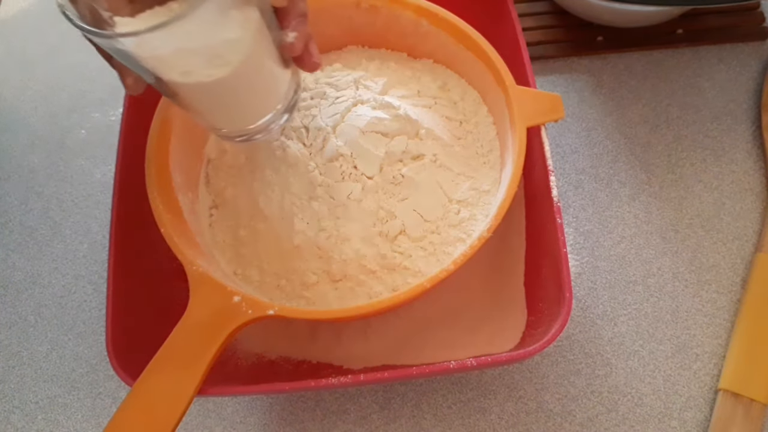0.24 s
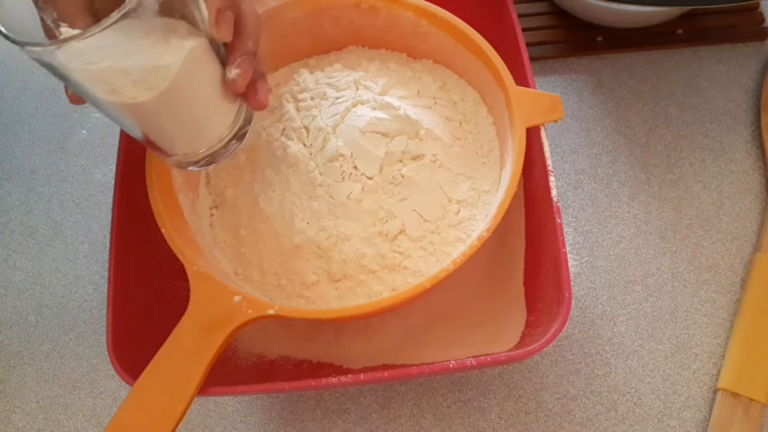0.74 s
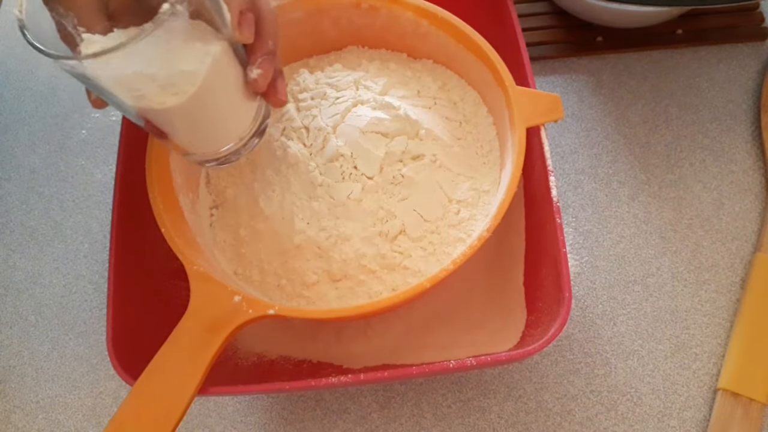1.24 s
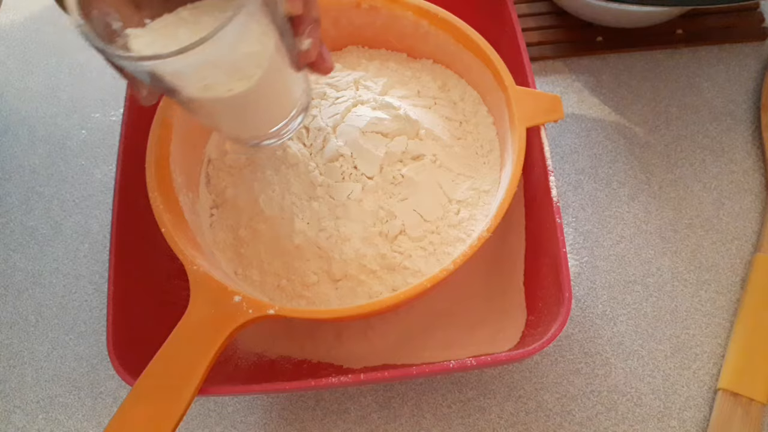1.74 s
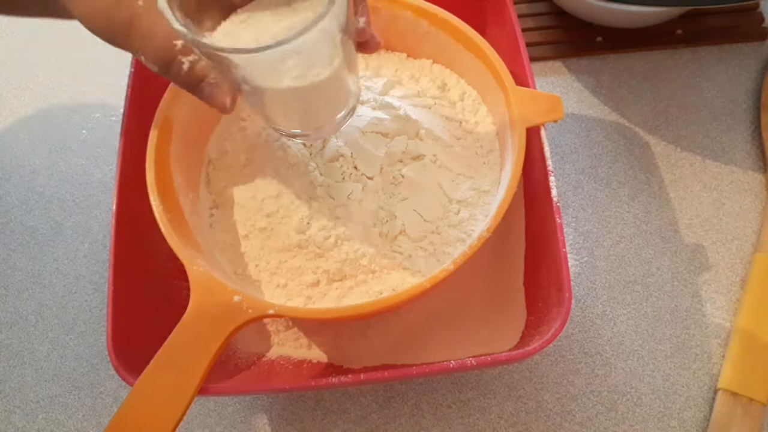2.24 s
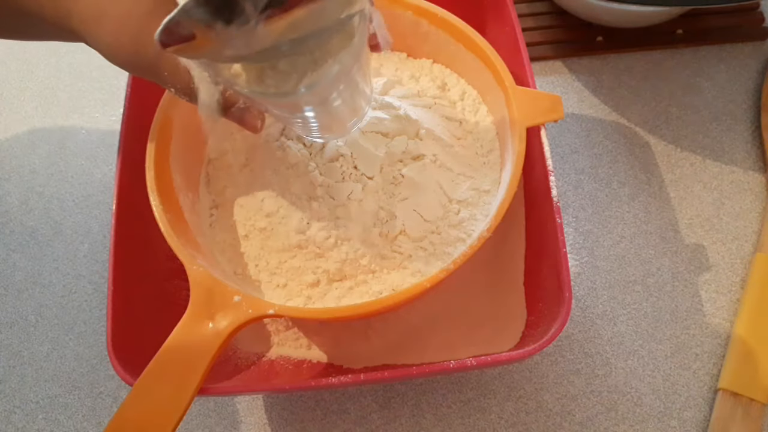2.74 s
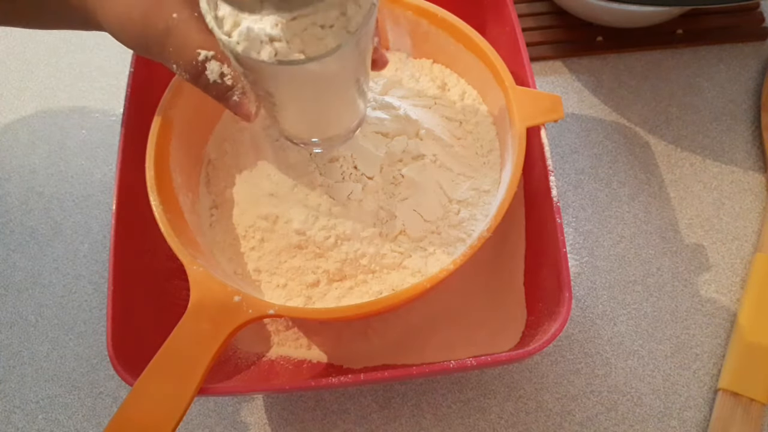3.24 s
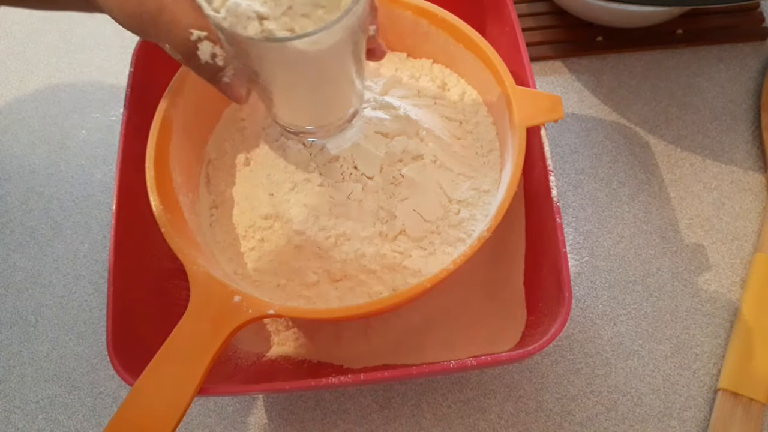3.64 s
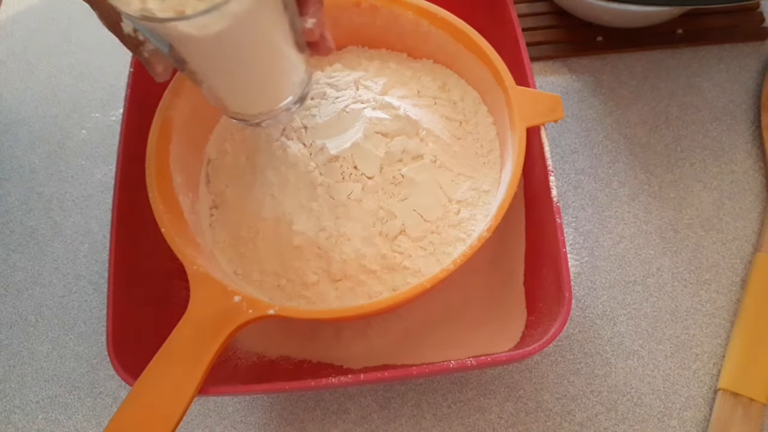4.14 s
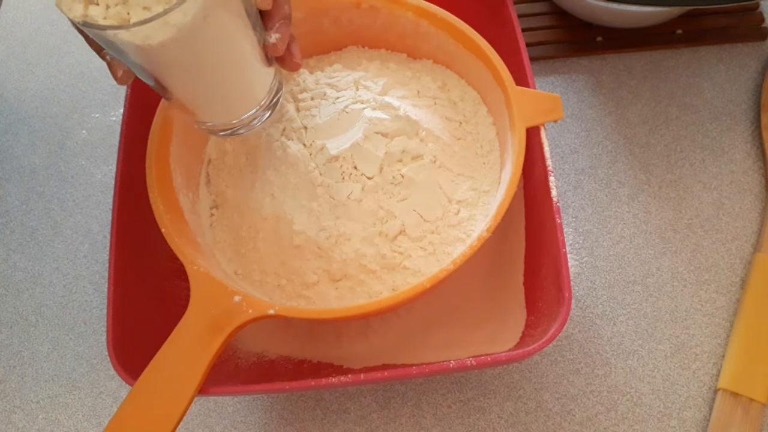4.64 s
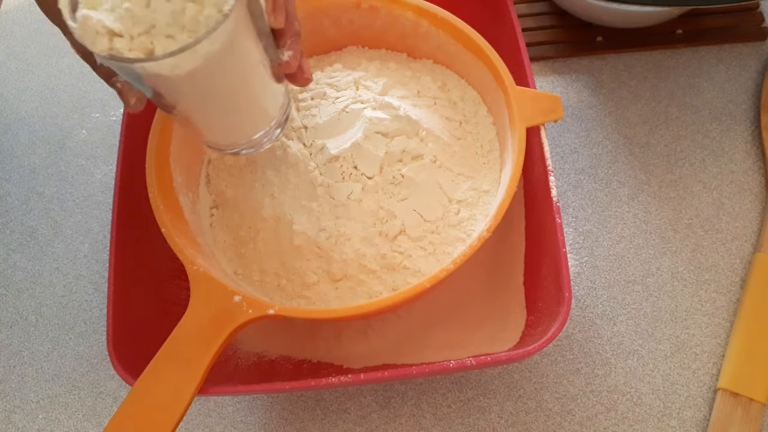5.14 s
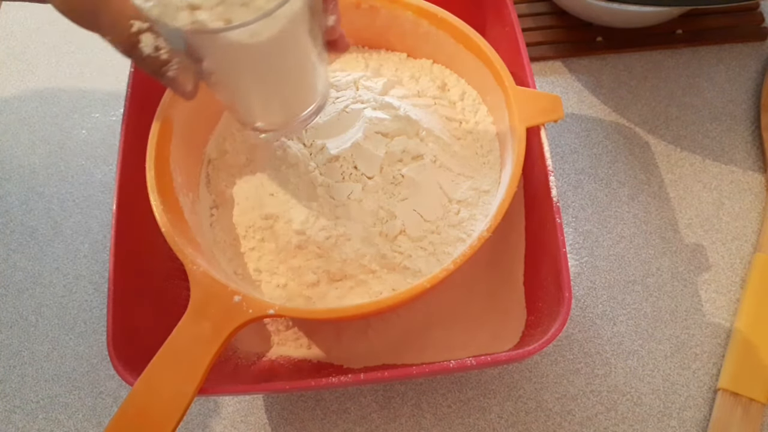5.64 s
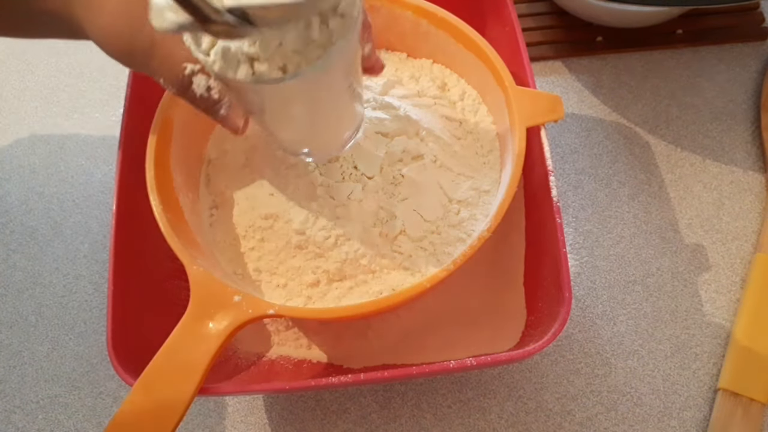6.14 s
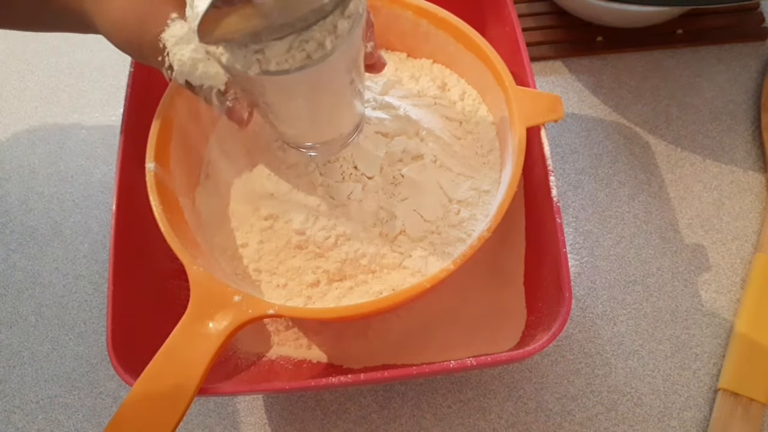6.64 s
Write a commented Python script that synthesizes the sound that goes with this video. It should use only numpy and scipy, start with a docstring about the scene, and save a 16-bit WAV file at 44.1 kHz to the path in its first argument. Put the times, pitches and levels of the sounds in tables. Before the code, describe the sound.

Two short spells of rustling, recorded closely with slight stereo width and a short room echo. A spoon rasps through flour while its paper bag crackles, pops and thumps softly. Between the spells lies a low soft room hush, with a faint bump and the slightest whisper of flour sliding into a glass. The second spell is busier and ends in a strong scrape and snap, before another almost silent pour.

```python
"""A small kitchen, a close pair of microphone ports: a spoon twice digs flour out of a paper bag into a glass.
The digging is grains of filtered noise: the spoon scrapes through powder, the bag's walls rumble, paper crinkles.
Creases snap as noise bursts that ring; the walls flex with soft thuds of decaying sines and a puff of air.
The pouring is only a faint powdery hiss, with dull bumps of hand, spoon and glass.
The room answers with decaying noise echoes, over a quiet hush of coloured noise."""
import sys
import numpy as np
from scipy import signal
from scipy.fft import rfft, irfft, next_fast_len
from scipy.io import wavfile
from scipy.ndimage import uniform_filter1d, map_coordinates

SR = 44100
rng = np.random.default_rng(int(sys.argv[2]) if len(sys.argv) > 2 else 0)


def inscribe(sig):
    """Save sig as 16-bit PCM at rate SR to the path in sys.argv[1].

    A 1-D sig is mono; a 2-D sig holds one channel per row.
    Samples are clipped to [-1, 1] before scaling.
    """
    pcm = np.round(np.clip(np.atleast_2d(sig).T, -1, 1) * 32767)
    wavfile.write(sys.argv[1], SR, pcm.astype(np.int16))


N = 304290  # length in samples

# colour of the quiet room: f/Hz, level/dB per Hz
HUSH_SPECTRUM = [(20, 0), (45, -13.5), (90, -1), (145, 0), (200, -3), (255, -5.5), (350, -4.5), (520, -9),
                 (850, -11), (1800, -15), (4000, -19.5), (7000, -26), (9500, -29), (13000, -25)]
# difference between the ports for the hush: f/Hz, side re mid/dB
HUSH_WIDTH = [(60, -19.5), (300, -18), (700, -12.5), (2200, -11.5), (7000, -2.5)]
# difference between the ports for rustle and echoes: f/Hz, side re mid/dB
RUSTLE_WIDTH = [(60, -47), (3100, -90.5), (3800, -35.5), (5000, -5), (13000, -6.5)]
# reverberation of the kitchen: f/Hz, t60/s
KITCHEN_T60 = [(100, 0.24), (260, 0.46), (1800, .37), (5000, .35), (12000, 0.23)]
# flour slides off the spoon: t of peak/s, peak hiss level/dB, rise/s, fall by 60 dB/s (negative: grows on)
POURS = [(2.782, -66, .003, .1), (2.83, -75, .06, 3.16), (2.975, -62, 0.078, 0.1), (6.4, -73, .06, 0.5),
         (6.743, -60, .003, 0.0061), (6.89, -75.5, 0.115, -2.57)]
# colour of the sliding flour: f/Hz, level/dB per Hz
POWDER_SPECTRUM = [(300, -35), (900, -4.5), (1800, -5), (2800, -0.5), (4200, -15), (6000, -5),
                   (7500, -10.5), (9500, -5.5), (13000, -10.5)]
# faint bumps of hand, spoon and glass: t/s, peak level/dB, f/Hz, t60/s
BUMPS = [(2.202, -57, 142.7, 0.36), (2.97, -59.5, 160.1, 0.187), (5.885, -54, 298, 0.31),
         (6.682, -57, 1091, 0.0947), (6.689, -58, 215.7, 0.62), (6.74, -58, 1240, 0.0247)]
# the bag's wall is pushed in: t/s, peak level before the bass cut/dB, f/Hz, hollow re wall/dB
THUDS = [(0.264, -44.5, 185, -9), (0.42, -34, 227, 1.5), (0.71, -31.5, 341, -8.5), (0.968, -40, 145, 3),
         (0.99, -31, 137.1, -5), (1.144, -38, 355, -1), (1.276, -28, 351.5, 1.5), (1.494, -31.5, 180, 5.5),
         (1.912, -35.5, 151, -9.5), (4.311, -31, 305.7, -3), (4.41, -32, 399, -5), (4.537, -28, 348.4, -3),
         (4.777, -38, 145.1, -2), (4.856, -37, 200.2, 1.5), (5.287, -31.5, 330.2, -13.5),
         (5.527, -36, 143, -9.5)]
# resonances of the bag's hollow: f/Hz, level/dB, t60/s
BAG_MODES = [(140, -17, .1), (199, -10, .1), (345, -6, .06), (480, -10, .03)]
# creases that snap: t/s, peak level/dB, f/Hz, ring re crack/dB
SNAPS = [(0.263, -38.5, 1200, -5.5), (0.42, -27, 373, 2), (0.455, -28.5, 1140, 6), (0.534, -14, 3730, -6),
         (0.991, -25.5, 1333, -3.5), (1.22, -29, 1367, 0), (1.273, -28, 1195, -5),
         (1.494, -13.5, 1064, -0.5), (1.905, -27, 967, 2.5), (4.309, -33, 1340, -8.5),
         (4.342, -28, 1210, -2), (4.411, -34, 515, 1.5), (4.5351, -21, 510, -1), (4.5576, -12.5, 5240, 0.5),
         (4.848, -28.5, 980, -2), (4.969, -27.5, 1126, 2), (5.021, -19, 3200, -10.5),
         (5.131, -25.5, 1163, 12), (5.497, -29.5, 1210, 5.5), (5.524, -20.5, 2885, -1)]
# colour of a snap's crack: f/Hz, level/dB per Hz
CRACK_SPECTRUM = [(30, -33), (100, -14.5), (320, 4), (700, -10), (1200, 8), (2000, -1), (3200, 6),
                  (6000, -3), (9000, -4), (13000, -11.5)]
# the paper crumples brightly as the spoon levers against it: t of peak/s, peak level/dB
CRUMPLES = [(0.282, -52), (0.995, -40), (1.114, -48.5), (1.278, -46), (1.37, -50.5), (1.895, -39.5),
            (4.497, -40.5), (4.545, -42), (5.519, -42)]
# colour of the crinkling paper: f/Hz, level/dB per Hz
CRINKLE_SPECTRUM = [(900, -38), (1800, -6), (2600, 2), (3300, -3), (4500, -2.5), (5500, -6), (6400, -5.5),
                    (7600, -8.5), (8700, -5), (9500, -12.5), (13000, -16.5)]
# colour of the shaken walls and of their puffs of air: f/Hz, level/dB per Hz
RUMBLE_SPECTRUM = [(30, -40.5), (70, -14.5), (110, -10.5), (140, -1.5), (220, -1.5), (260, -3), (345, 2.5),
                   (440, -5), (650, -20), (1500, -56.5)]
# colour of the spoon in the flour: f/Hz, level/dB per Hz
SCRAPE_SPECTRUM = [(250, -33.5), (400, -11.5), (510, 1), (740, -1), (950, -1), (1150, 1.5), (1400, 1.5),
                   (1900, -5), (2600, -11), (5000, -41)]
# pushes of the spoon through the flour: t/s, attack/s, length/s, scrape level/dB,
# wall rumble re scrape/dB, crinkle re scrape/dB, swell/(dB per s)
STROKES = [(0.262, 0.0036, .025, -57, -1, -1.5, -0.5), (0.416, 0.0056, 0.36, -47.5, -2.5, -0.5, -4.5),
           (0.694, .008, 0.0094, -45.5, -7.5, 0.5, -1.5), (0.896, 0.0078, .29, -51.5, -2, -1.5, -8.5),
           (1.199, 0.054, 0.4, -50, -7, 0.5, 6), (1.631, .06, 0.14, -53.5, -7, 3, -12),
           (1.782, 0.036, 0.117, -52, -7, -0.5, 35), (4.31, .01, 0.047, -45.5, -2, -2, -3),
           (4.407, 0.0071, 0.19, -44.5, -3, 0, 20.5), (4.673, 0.048, 0.18, -51.5, -1, 1, 37.5),
           (4.919, .04, 0.21, -46.5, -7.5, -0.5, 14), (5.132, .006, 0.053, -43, -20, -7.5, -60.5),
           (5.228, 0.032, .085, -39.5, -17, -6, 0), (5.334, 0.024, .19, -48.5, -5, 0, -16)]

HUSH_DB = -69
TOP_HZ = 13200  # upper band limit of the recorder
CRUMPLE_RISE_S, CRUMPLE_FALL_S = 0.04, 0.16  # the fall is by 60 dB
CRUMPLE_BRIGHT_DB = 7  # treble re bass
STROKE_RELEASE_DB_PER_S = 190  # how fast a stroke dies once the spoon stops pushing
UNEVEN_DB, UNEVEN_RATE = 1.46, 35  # the spoon sticks and slips unevenly: depth/dB, knots per second
# a deep spoon scrapes loudly and muffles the paper:
NEUTRAL_DB = -48.5  # scrape level at which the colour is neutral
DULLING = 0.7  # dB of brightness lost per dB of scrape


def amp(db):
    """Decibels to gain."""
    return 10 ** (np.asarray(db) / 20)


def unit(x):
    """Scale to rms 1."""
    return x / np.sqrt(np.mean(x ** 2) + 1e-20)


def along(points, hz):
    """(f/Hz, value) points read on a log frequency axis."""
    f, value = np.transpose(points)
    return np.interp(np.log(hz + 1), np.log(f + 1), value)


def wobble(rate):
    """A smooth random curve, rate knots a second."""
    knots = rng.standard_normal(int(N * rate / SR) + 4)
    return map_coordinates(knots, [np.arange(N) * rate / SR])


def coloured(x, spectrum, size=4096):
    """x through a causal minimum-phase filter with the given spectrum."""
    cepstrum = irfft(np.log(amp(along(spectrum, np.fft.rfftfreq(size, 1 / SR)))))
    # folding the cepstrum onto positive time makes the filter causal
    cepstrum[1:size // 2] *= 2
    cepstrum[size // 2 + 1:] = 0
    impulse = irfft(np.exp(rfft(cepstrum)))
    return signal.fftconvolve(x, impulse)[:len(x)]


def fading(t, t60):
    """Exponential decay, 60 dB down at t60."""
    return np.exp(-np.log(1000) * t / t60)


def add(track, s, sound):
    """Mix a sound in at time s."""
    part = track[round(s * SR):][:len(sound)]
    part += sound[:len(part)]


def swells(rows):
    """Gain of swells that gather to a peak and then change exponentially; their powers add."""
    power, t = np.zeros(N), np.arange(SR // 2) / SR
    for s, db, rise, fall in rows:
        gather = np.minimum(t / rise, 1) ** 2
        gain = amp(db) * gather * fading(np.maximum(t - rise, 0), fall)
        add(power, s - rise, gain ** 2)
    return np.sqrt(power)


def grains(spectrum, rate, spread_db, clump_db, clump_rate):
    """Tiny slips of random size, rate a second on average, that come in clumps; rms 1."""
    slips = (rng.random(N) < rate / SR) * rng.choice([-1, 1], N)
    size_db = spread_db * np.minimum(rng.standard_normal(N), 2)
    size_db += clump_db * np.minimum(wobble(clump_rate), 2)
    return unit(coloured(slips * amp(size_db), spectrum))


def tilted(x, tilt_db, pivot_hz):
    """Lift what lies above the pivot against what lies below it, roughly keeping the power."""
    low = signal.sosfiltfilt(signal.butter(2, pivot_hz, fs=SR, output="sos"), x)
    up = amp(tilt_db / 2)
    return (low / up + (x - low) * up) / np.sqrt((up ** 2 + up ** -2) / 2)


def shifting(x, depth_db, size=512):
    """Resonances shift as the material bends: patches of the spectrum swell and fade; rms 1."""
    z = signal.stft(x, nperseg=size)[2]
    across_hz = uniform_filter1d(rng.standard_normal(z.shape), size=4, axis=0)
    patches = uniform_filter1d(across_hz, size=10, axis=1)
    return unit(signal.istft(z * amp(depth_db * unit(patches)), nperseg=size)[1][:N])


def hush():
    """The quiet room: steady coloured noise whose level wavers slightly."""
    level = amp(HUSH_DB + 0.3 * wobble(5))
    return level * unit(coloured(rng.standard_normal(N), HUSH_SPECTRUM))


def ports(x, width, size=256):
    """Sound at two close microphone ports: a phase-scrambled side signal sets them apart by frequency."""
    z = signal.stft(x, SR, nperseg=size)[2]
    scattered = signal.istft(z * np.exp(2j * np.pi * rng.random(z.shape)), nperseg=size)[1][:N]
    side_gain = amp(along(width, np.fft.rfftfreq(N, 1 / SR)))
    side = irfft(rfft(unit(scattered)) * side_gain, N) * x.std()
    return np.array([x + side, x - side])


def kitchen(x, count=24):
    """Walls and worktop answer with decaying noise; the echo pattern changes as the hands move."""
    wet, knots = np.zeros(N), np.linspace(0, N, count)
    for knot in knots:
        hz, t, z = signal.stft(rng.standard_normal(SR // 2), SR, nperseg=256)
        decay = fading(t, along(KITCHEN_T60, hz)[:, None])
        tail = signal.istft(z * decay, SR, nperseg=256)[1]
        # crossfade from one echo pattern to the next
        near = np.flatnonzero(np.abs(np.arange(N) - knot) < knots[1])
        piece = x[near] * np.cos(np.pi / 2 * (near - knot) / knots[1])
        echo = signal.fftconvolve(piece, tail / np.linalg.norm(tail))
        add(wet, near[0] / SR + 0.004, echo)  # 4 ms path to the nearest surface
    return wet


def pouring():
    """Flour hisses faintly into the glass: many tiny grains under slow or brief swells."""
    powder = grains(POWDER_SPECTRUM, rate=6000, spread_db=4, clump_db=1.5, clump_rate=80)
    return swells(POURS) * powder


def bumps(ring_cycles=14, brush_db=-7):
    """Hand and spoon brush the glass: fading noise excites a short ring, under a dull brush of the same noise."""
    out, t = np.zeros(N), np.arange(SR // 4) / SR
    for s, db, hz, t60 in BUMPS:
        touch = rng.standard_normal(len(t)) * fading(t, t60)
        mode = np.sin(2 * np.pi * hz * t) * fading(t, ring_cycles / hz)
        ring = signal.fftconvolve(touch, mode)[:len(t)]
        brush = coloured(touch, [(hz, 0), (13000, -26)])
        bump = unit(ring) + amp(brush_db) * unit(brush)
        add(out, s, amp(db) * bump / np.abs(bump).max())
    return out


def thuds(wall_cycles=16, attack=0.0013, puff=0.63):
    """A pushed wall swings for a few cycles, drives a puff of air and rings the hollow of the bag."""
    out, t = np.zeros(N), np.arange(SR // 3) / SR
    for s, db, hz, hollow_db in THUDS:
        modes = [(hz, 0, wall_cycles / hz)]
        modes += [(f, level + hollow_db, t60) for f, level, t60 in BAG_MODES]
        swing = np.zeros(len(t))
        for f, level, t60 in modes:
            gain = amp(level + rng.standard_normal())  # each mode is struck a little differently
            swing += gain * np.sin(2 * np.pi * (f * t + rng.random())) * fading(t, t60)
        air = coloured(rng.standard_normal(len(t)) * fading(t, 0.028), RUMBLE_SPECTRUM)
        thud = (unit(swing) + puff * unit(air)) * (1 - np.exp(-t / attack))
        add(out, s, amp(db) * thud / np.abs(thud).max())
    # a small bag radiates no deep bass
    return signal.sosfilt(signal.butter(2, 100, "high", fs=SR, output="sos"), out)


def snaps(life=0.017):
    """A crease gives way with one sharp slip and a quick burst; the stiff paper around it rings briefly."""
    out, t = np.zeros(N), np.arange(SR // 16) / SR
    for s, db, hz, ring_db in SNAPS:
        slips = rng.standard_normal(len(t)) * fading(t, life)
        slips[0] = 2.8  # the sharp first slip
        patch = np.sin(2 * np.pi * hz * t) * fading(t, 14 / hz)  # 60 dB down after 14 cycles
        # differencing: the ring holds little far below its own pitch
        ring = np.diff(signal.fftconvolve(slips, patch)[:len(t)], prepend=0)
        snap = unit(coloured(slips, CRACK_SPECTRUM)) + amp(ring_db) * unit(ring)
        add(out, s, amp(db) * snap / np.abs(snap).max())
    return out


def crinkling_paper():
    """Paper crinkles: dense clumped slips coloured by resonances that shift as it bends; rms 1."""
    slips = grains(CRINKLE_SPECTRUM, rate=6000, spread_db=5, clump_db=1.9, clump_rate=140)
    return shifting(slips, depth_db=2.5)


def crumpling():
    """Short bright flurries of the paper's crinkle as the spoon levers against it."""
    flurries = swells([(s, db, CRUMPLE_RISE_S, CRUMPLE_FALL_S) for s, db in CRUMPLES])
    return flurries * tilted(crinkling_paper(), CRUMPLE_BRIGHT_DB, pivot_hz=5000)


def pushes():
    """Gains of scrape, rumble and crinkle: a stroke bites, swells or sags, then dies as the flour settles."""
    power, t = np.zeros((3, N)), np.arange(SR) / SR
    for s, attack, length, db, wall_db, crinkle_db, swell in STROKES:
        swell_db = swell * (np.minimum(t, length) - length / 2)
        release_db = STROKE_RELEASE_DB_PER_S * np.maximum(t - length, 0)
        shape = np.minimum(t / attack, 1) * amp(db + swell_db - release_db)
        for layer, layer_db in zip(power, (0, wall_db, crinkle_db)):
            add(layer, s, (amp(layer_db) * shape) ** 2)
    return np.sqrt(power) * amp(UNEVEN_DB * wobble(UNEVEN_RATE))


def digging():
    """The spoon's slips shake the walls, rasp through the flour and crinkle the paper."""
    scraping, shaking, crinkling = pushes()
    start, _, length, scrape_db, *_ = np.transpose(STROKES)
    depth_db = np.interp(np.arange(N) / SR, start + length / 2, scrape_db)
    bright_db = DULLING * (NEUTRAL_DB - depth_db)
    rumble = grains(RUMBLE_SPECTRUM, rate=1200, spread_db=2, clump_db=1.2, clump_rate=50)
    rasp = grains(SCRAPE_SPECTRUM, rate=2500, spread_db=3.5, clump_db=2, clump_rate=110)
    scrape = tilted(shifting(rasp, depth_db=2.4), bright_db, pivot_hz=1000)
    crinkle = tilted(crinkling_paper(), bright_db, pivot_hz=5000)
    return shaking * rumble + scraping * scrape + crinkling * crinkle


def scene():
    """All the handling in the kitchen, over its steady hush."""
    rustle = digging() + crumpling() + bumps() + pouring()
    cracks, knocks = snaps(), thuds()
    room = kitchen(amp(-7.0) * rustle + amp(-6.5) * cracks + amp(-2) * knocks)
    # snaps and thuds sound the same in both channels
    return cracks + knocks + ports(rustle + room, RUSTLE_WIDTH) + ports(hush(), HUSH_WIDTH)


def record(dry):
    """The recorder rolls off very steeply above its band limit."""
    size = next_fast_len(N + SR // 2)
    hz = np.fft.rfftfreq(size, 1 / SR)
    gain = 1 / np.sqrt(1 + (hz / TOP_HZ) ** 120)
    return irfft(rfft(dry, size) * gain, size)[:, :N]


dry = scene()
out = record(dry)
inscribe(out)
```